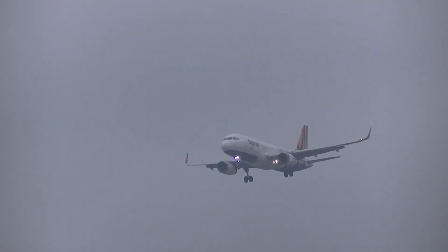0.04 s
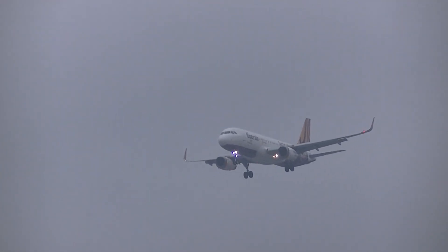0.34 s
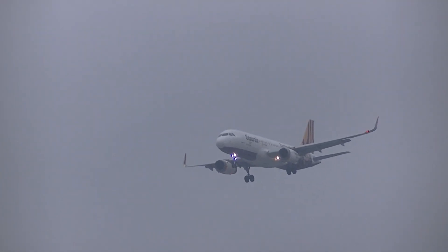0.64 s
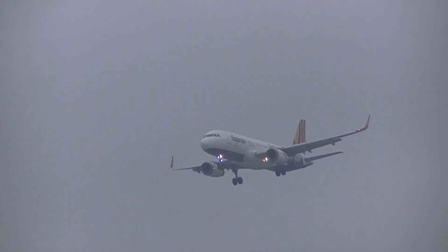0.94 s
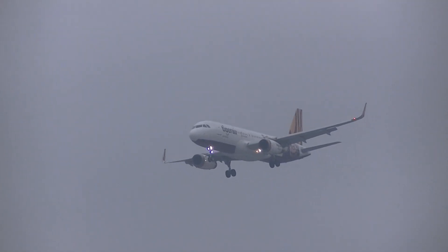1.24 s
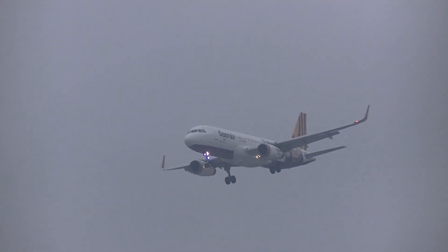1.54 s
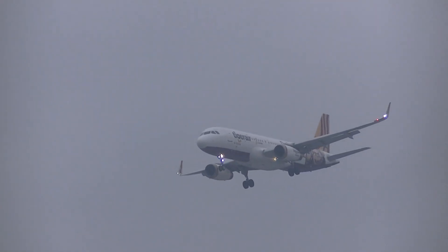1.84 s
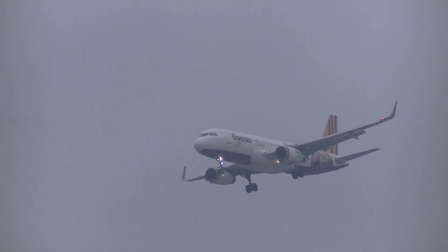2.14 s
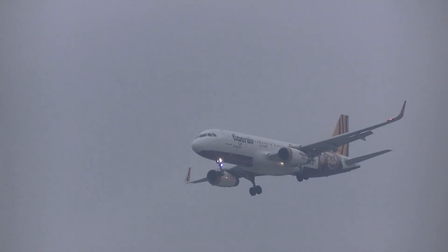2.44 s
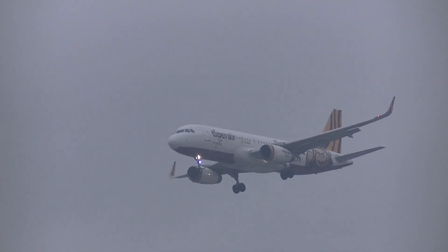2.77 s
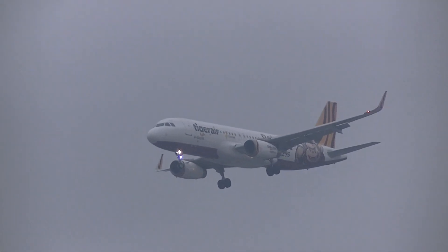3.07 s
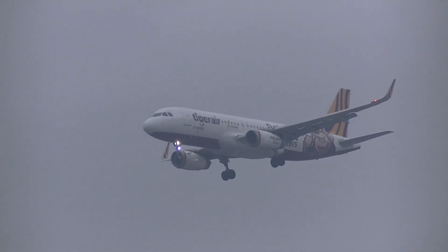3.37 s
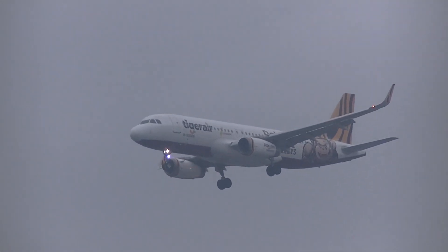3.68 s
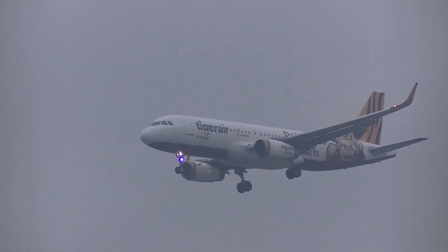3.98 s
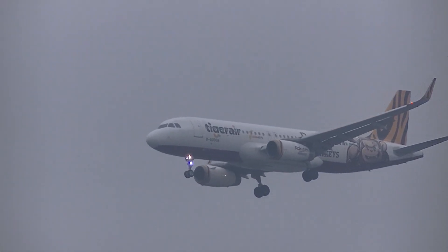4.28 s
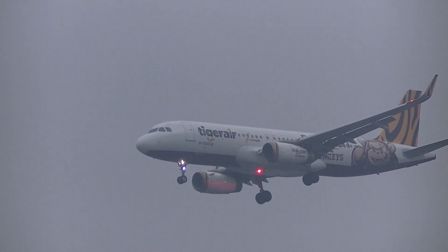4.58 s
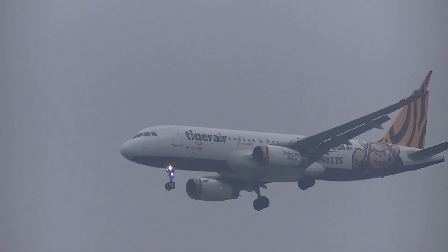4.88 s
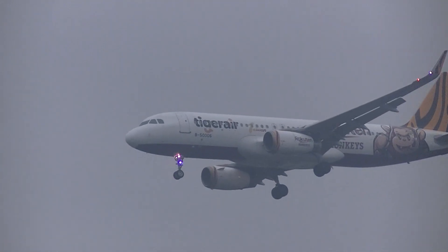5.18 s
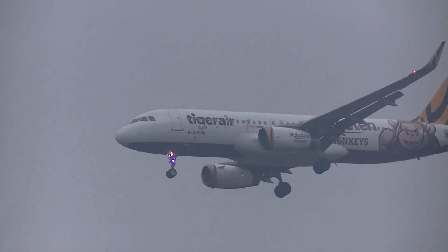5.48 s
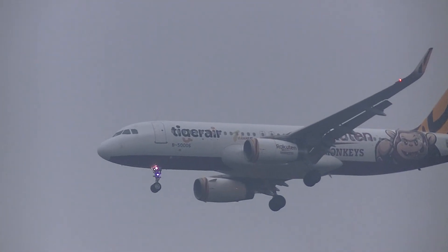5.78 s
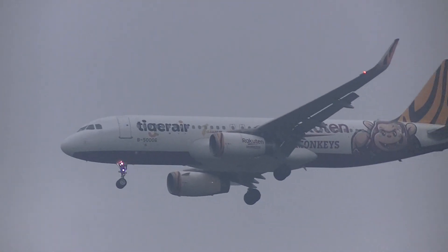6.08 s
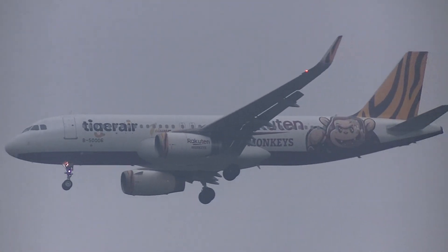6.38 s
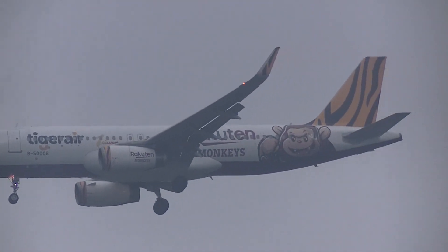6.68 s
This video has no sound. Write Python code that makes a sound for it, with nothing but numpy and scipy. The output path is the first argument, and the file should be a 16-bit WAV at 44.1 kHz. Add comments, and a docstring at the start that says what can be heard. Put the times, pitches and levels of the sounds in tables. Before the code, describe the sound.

From beneath a landing path, a stereo microphone in light air picks up an approaching airliner. Its turbofan hiss and airy roar build over the first few seconds, then stay loud and fluttering above an uneven rumble. A high whine flares and fades while gradually dropping in pitch, joined by a thin whistling rasp and faint sizzle. A small tick passes before halfway, and the roar takes on a hollow, phasing tone as the jet comes alongside.

```python
"""On the ground under a final approach path, a twin-engine airliner comes in low and draws level.
Fan hiss, airframe roar and jet rumble swell and waver in turbulent air, while the Doppler effect
slides the fan's whine down. Interference with a ground echo hollows the gusty low end.
A closely spaced stereo microphone listens in a light breeze. A narrow rasp with faint whistles,
a faint high sizzle and one small tick are also heard."""
import sys
import numpy as np
from scipy import signal
from scipy.io import wavfile

SR = 44100
rng = np.random.default_rng(int(sys.argv[2]) if len(sys.argv) > 2 else 0)


def dump(signal):
    """Clip the signal to [-1, 1] and save it as 16-bit WAV at the path in sys.argv[1]."""
    limited = np.clip(np.atleast_2d(signal).T, -1, 1)
    pcm = np.round(limited * 32767).astype(np.int16)
    wavfile.write(sys.argv[1], SR, pcm)


N = 300762
# Noise sources return a gain over frequency (HZ) and time (FRAME_S); tones return samples.
FRAME, HOP = 1024, 256
HZ = np.maximum(np.fft.rfftfreq(FRAME, 1 / SR), 1)[:, None]
FRAME_S = np.arange(-(-N // HOP) + 1) * HOP / SR
SAMPLE_S = np.arange(N) / SR


# intake noise: time_s, level_db
INTAKE_LEVEL = [(0.03, -36.5), (.6, -33), (1.0, -30.5), (1.17, -28), (1.58, -28), (1.85, -24.5),
                (2.09, -23), (2.22, -25), (2.65, -24.5), (2.85, -25), (3.15, -24), (3.35, -22.5),
                (3.9, -21.5), (4.24, -19), (4.36, -20.5), (4.5, -19.5), (4.8, -20), (5.35, -19.5),
                (5.59, -18.5), (5.78, -23.5), (6.06, -23), (6.21, -16.5), (6.33, -23.5), (6.52, -21.3),
                (6.65, -18), (6.8, -24.5)]
# its brief gusts and sags: centre_s, change_db
INTAKE_GUSTS = [(2.08, 1), (2.68, 1), (3.68, 2), (4.91, -2), (5.03, 1.5), (5.34, 1.7), (5.42, -0.5)]
# its spectrum: frequency_hz, density_db
INTAKE_SPECTRUM = [(200, -77), (900, -32), (1500, -15.5), (1950, -2), (2450, -0.3), (2800, -1.5),
                   (3200, 1.5), (3800, -2), (4280, 1.5), (4470, 3), (4700, 2), (5500, 0.5), (6300, -5),
                   (7300, -12), (9000, -21.5), (10000, -44.5)]
# its top band against its main band, which sets the air absorption: time_s, ratio_db
INTAKE_TREBLE = [(0, -18.5), (.6, -23), (2.0, -23), (4.2, -15.5), (6.82, -12.5)]

def fan_hiss():
    """Atmospheric absorption dulls the intake noise as frequency squared, less as the path shortens."""
    treble_db, = in_time(INTAKE_TREBLE)
    spectrum_db, = by_frequency(INTAKE_SPECTRUM)
    main_hz, top_hz = (2300, 5500), (6500, 9000)
    unabsorbed = from_db(spectrum_db)
    clear_db = 20 * np.log10(band_rms(unabsorbed, top_hz) / band_rms(unabsorbed, main_hz))
    air_db = (treble_db - clear_db) * np.minimum(HZ / 6800, 1.35) ** 2
    hiss = shaped_noise(spectrum_db + air_db, intake_level() - .6, main_hz)
    return hiss * turbulence(rate_hz=19.7, shared_db=0.44, patchy_db=1.61)


def intake_level():
    """Gains add in decibels: brief gusts and sags ride on the level of the intake noise."""
    return in_time(INTAKE_LEVEL)[0] + swells(INTAKE_GUSTS, half_s=0.051)


# Doppler glide of the blade-passing tone: time_s, pitch_hz
BLADE_PITCH = [(0, 2134), (.7, 2120), (1.05, 2100), (1.9, 2095), (3.0, 2072), (3.55, 2052), (4.0, 2028),
               (5.1, 1988), (5.3, 1970), (5.55, 1938), (5.95, 1905), (6.15, 1898), (6.55, 1860),
               (6.82, 1843)]
# the whine between flares: time_s, level_db
WHINE_LEVEL = [(0, -43), (.4, -44.5), (1.9, -32), (2.7, -38), (4.3, -34), (4.7, -30), (5.6, -31),
               (6.82, -29)]
# its momentary flares and fades: centre_s, half_length_s, change_db
WHINE_FLARES = [(.75, .025, -12), (.84, .04, 4), (1.08, .04, 7), (1.26, .04, -13), (1.36, .03, 6),
                (1.44, .02, -12), (2.0, .03, 5), (2.14, .03, 7), (2.23, .04, 9), (2.85, .03, -13),
                (2.94, .04, 7), (3.03, .03, 7.5), (3.68, .035, 5), (3.82, .025, -9), (4.4, .025, 4),
                (4.5, .035, 6), (4.66, .03, 7.5), (5.28, .055, 10.5), (5.5, .025, 5.5), (5.7, .02, -8),
                (5.77, .03, 3), (5.89, .035, -15), (5.97, .04, 7), (6.14, .04, 13), (6.33, .045, 8.5),
                (6.44, .022, -10), (6.53, .06, 8.5), (6.63, .025, 4), (6.72, .025, -4), (6.78, .025, 7.5)]
# its eddy-scattered part against its steady part: time_s, scatter_ratio
WHINE_SCATTER = [(0, .85), (3.5, .8), (4.5, .4), (5.3, .3), (6.82, .28)]

def fan_whine(jitter=0.001995, skirt_db=-10, low_ratio=.648):
    """The Doppler effect lowers the blade-passing tone and a faint lower engine tone on one glide."""
    pitch_hz, = in_time(BLADE_PITCH, SAMPLE_S)
    scatter, = in_time(WHINE_SCATTER, SAMPLE_S)
    flare_db = sum(db * bell(SAMPLE_S - s, half_s) for s, half_s, db in WHINE_FLARES)
    level_db = in_time(WHINE_LEVEL, SAMPLE_S)[0] + flare_db
    phase = 2 * np.pi * np.cumsum(pitch_hz * (1 + jitter * wander(10.4))) / SR
    # fast eddies spread a narrow skirt of noise around the tone
    skirt = from_db(skirt_db) * (wander(70) * np.cos(phase) + wander(70) * np.sin(phase))
    blades = from_db(level_db) * (scattered_tone(phase, scatter) + skirt)
    airframe_db, _ = in_time(FLOW_LEVELS, SAMPLE_S)
    low_tone = from_db(airframe_db - 13.5) * scattered_tone(low_ratio * phase, scatter=0.39)
    return blades + low_tone


# flow noise: time_s, airframe_db, jet_db
FLOW_LEVELS = [(0.03, -40.5, -53), (0.22, -42, -47), (0.43, -40, -56), (0.92, -39.5, -47.5),
               (1.24, -36.5, -48), (1.33, -33, -42.5), (1.6, -34, -40), (2.03, -28.5, -40.5),
               (2.09, -28.5, -31), (2.4, -28, -30), (2.68, -27, -30), (3.0, -30.5, -32.5), (3.35, -30, -31),
               (3.57, -24, -33), (3.69, -27, -28.5), (4.19, -28, -37), (4.46, -27.5, -35),
               (4.56, -23.5, -33.5), (4.8, -28.5, -33), (4.93, -27, -39), (4.99, -22, -33),
               (5.57, -26, -33), (5.88, -29.5, -35.5), (6.2, -23.5, -32), (6.42, -23, -28.5),
               (6.8, -26.5, -28)]
# flaps and gear: frequency_hz, density_db
AIRFRAME_SPECTRUM = [(80, -63), (400, -36), (700, -6), (950, -1.5), (1130, -1.5), (1300, 1.5), (1450, -1),
                     (1700, 0.5), (2300, -7), (4000, -33), (10000, -72)]
# exhaust jets: frequency_hz, density_db
JET_SPECTRUM = [(30, -75), (120, -57), (280, -7.5), (370, .5), (520, 4.5), (620, 5), (780, 2), (1100, 2),
                (2000, -56), (8000, -80)]

def roar():
    """Turbulent flow radiates broadband noise from flaps and gear, and deeper noise from the jets."""
    airframe_db, jet_db = in_time(FLOW_LEVELS)
    pitch_hz, = in_time(BLADE_PITCH)
    shifted_db, = by_frequency(AIRFRAME_SPECTRUM, doppler=pitch_hz / 2000)
    airframe = shaped_noise(shifted_db, airframe_db - 1.72, band_hz=(850, 1750))
    jets = shaped_noise(by_frequency(JET_SPECTRUM)[0], jet_db - 1.3, band_hz=(400, 750))
    return np.hypot(airframe, jets) * turbulence(rate_hz=14.4, shared_db=1.0, patchy_db=1.15)


# swells of the noise: centre_s, frequency_hz, half_length_s, half_width_octaves, rise_db
SURGES = [(2.16, 1250, 0.073, 0.38, 9), (2.46, 316, 0.17, 0.18, 9.5), (3.417, 1810, 0.041, .25, 6),
          (5.047, 795, 0.5, 0.14, 4.5), (5.316, 1910, 0.063, 0.49, 5), (5.53, 560, 0.11, 0.2, 8.5),
          (6.55, 964, 0.27, 0.061, 7.5)]

def surges():
    """Band-limited amplitude modulation: the noise swells briefly in one register or another."""
    return from_db(sum(db * bell(FRAME_S - s, half_s) * bell(np.log2(HZ / hz), half_octaves)
                       for s, hz, half_s, half_octaves, db in SURGES))


# a rough narrow rasp: frequency_hz, density_db
RASP_SPECTRUM = [(2000, -55), (2850, -24), (3080, -0.5), (3380, 0), (3600, 1), (5000, -42)]

def rasp():
    """Fast amplitude modulation roughens a narrow band of noise near 3 kHz into a rasp."""
    band = shaped_noise(by_frequency(RASP_SPECTRUM)[0], rasp_level(FRAME_S), band_hz=(2900, 3600))
    return band * turbulence(rate_hz=23, shared_db=2.0, patchy_db=3.5)


# brief swells of the rasp: centre_s, rise_db
RASP_SWELLS = [(1.2, 6.5), (1.78, 4), (2.36, 5.5), (2.66, 8), (3.3, 6.5), (3.47, 4), (3.58, 3), (3.7, 0),
               (3.85, 5), (4.09, 7), (4.24, 5.5), (4.82, 3), (5.0, 6)]

def rasp_level(times, offset_db=-13, fade_db_per_s=0.6):
    """Gains add in decibels: the rasp follows the intake noise, swells briefly and slowly fades."""
    steady_db = in_time(INTAKE_LEVEL, times)[0] + offset_db - fade_db_per_s * times
    return steady_db + swells(RASP_SWELLS, half_s=0.061, times=times)


# faint whistles, set against the rasp's level: pitch_hz, relative_db
WHISTLES = [(3090, -7), (3210, -4.5), (3330, -5), (3470, -8)]

def whistles(waver_hz=35, flicker_db=3.5):
    """Independent frequency and amplitude modulation make each whistle in the rasp waver and flicker."""
    tones = 0
    for hz, db in WHISTLES:
        phase = 2 * np.pi * np.cumsum(hz + waver_hz * wander(7)) / SR
        tones += from_db(db + flicker_db * wander(17)) * scattered_tone(phase, scatter=1)
    return from_db(rasp_level(SAMPLE_S)) * tones


# steady low rumble: time_s, level_db
BUFFET_LEVEL = [(0, -43.5), (.5, -49), (1.0, -45.5), (1.7, -42), (2.0, -42.5), (2.4, -51), (3.3, -41),
                (4.1, -43), (5.1, -49.5), (5.9, -50.5), (6.82, -44)]
# its spectrum: frequency_hz, density_db
BUFFET_SPECTRUM = [(30, -70), (70, -52), (110, -19), (160, -3), (230, 5.5), (340, 4.5), (490, -5),
                   (700, -6), (4000, -81)]
# soft bumps within it: centre_s, half_length_s, level_db
BUMPS = [(.135, 0.0082, -36), (0.236, 0.02, -37), (0.708, 0.011, -33), (0.845, 0.084, -40),
         (1.035, 0.05, -39), (1.315, 0.055, -35), (1.637, 0.021, -36), (2.78, .025, -38),
         (3.26, .03, -35.5)]
# their spectrum: frequency_hz, density_db
BUMP_SPECTRUM = [(30, -70), (110, -22), (160, -5), (230, 5), (350, 2.5), (490, -0.5), (700, -12),
                 (4000, -81)]

def buffeting(band_hz=(120, 350)):
    """Incoherent addition: a low rumble and soft, slightly brighter bumps sum in power."""
    steady = shaped_noise(by_frequency(BUFFET_SPECTRUM)[0], in_time(BUFFET_LEVEL)[0], band_hz)
    envelope = sum(from_db(db) * bell(FRAME_S - s, half_s) for s, half_s, db in BUMPS)
    bumps = envelope * shaped_noise(by_frequency(BUMP_SPECTRUM)[0], 0, band_hz)
    return np.hypot(steady, bumps) * turbulence(rate_hz=41, shared_db=0.4, patchy_db=1.5)


# one small sharp contact: start_s, level_db, left_minus_right_db
TICKS = [(2.8553, -5, -9)]
# its modes: pitch_hz, relative_db, t60_s
TICK_MODES = [(5360, 4, 0.0023), (8100, -12, 0.0048), (10800, -11, 0.0037), (12800, -30, .006)]

def tick():
    """A tiny hard impact excites damped modes that ring for a few milliseconds, with no bass."""
    stereo = np.zeros((2, N))
    age_s = np.arange(SR // 20) / SR
    ring = sum(from_db(db) * np.exp(-np.log(1000) * age_s / t60_s) * np.sin(2 * np.pi * hz * age_s)
               for hz, db, t60_s in TICK_MODES)
    for start_s, db, pan_db in TICKS:
        start = round(start_s * SR)
        stereo[:, start:start + len(ring)] += from_db([[db + pan_db / 2], [db - pan_db / 2]]) * ring
    return signal.sosfilt(signal.butter(1, 900, "high", fs=SR, output="sos"), stereo + 1e-18)


# faint high sizzle: frequency_hz, density_db
SIZZLE_SPECTRUM = [(4000, -20), (9000, -2), (10000, -1), (11000, 1), (13000, 0), (16000, -1)]

def high_sizzle():
    """Amplitude modulation: a faint, even sizzle above 10 kHz follows the loudness of the hiss."""
    return shaped_noise(by_frequency(SIZZLE_SPECTRUM)[0], intake_level() - 41.5, band_hz=(10000, 16000))


# light air on the microphone: time_s, level_db
BREEZE_LEVEL = [(0, -80), (2.2, -81), (3.2, -79), (5.2, -73), (5.9, -74), (6.82, -71)]
# its puffs: centre_s, rise_db
BREEZE_PUFFS = [(.55, 2), (1.03, 15), (1.5, 4), (4.65, 9)]
# its spectrum: frequency_hz, density_db
BREEZE_SPECTRUM = [(20, -19), (50, -25), (80, -4), (115, 3), (150, 7), (250, -15), (2000, -70)]

def breeze():
    """Pressure fluctuations of light air on the microphone add a faint, uneven bass."""
    level_db = in_time(BREEZE_LEVEL)[0] + swells(BREEZE_PUFFS, half_s=0.049)
    bass = shaped_noise(by_frequency(BREEZE_SPECTRUM)[0], level_db, band_hz=(40, 110))
    return bass * turbulence(rate_hz=7.3, shared_db=3.5, patchy_db=1.5)


# ground reflection: time_s, lag_ms, strength_ratio
GROUND_ECHO = [(0, 2.25, .3), (2.2, 2.2, .25), (3.0, 2.3, .12), (4.2, 3.0, .15), (4.55, 3.45, .6),
               (4.8, 3.95, .75), (5.15, 4.4, .72), (5.6, 4.55, .65), (6.82, 4.6, .52)]

def with_ground_echo(direct, scatter_hz=537):
    """Comb filtering: the echo lags more as the aircraft's elevation grows, so the notches sink."""
    lag_ms, strength = in_time(GROUND_ECHO, SAMPLE_S)
    # rough ground scatters the treble away
    dull = signal.sosfiltfilt(signal.butter(2, scatter_hz, fs=SR, output="sos"), direct)
    echo = np.array([np.interp(SAMPLE_S - lag_ms / 1000, SAMPLE_S, side) for side in dull])
    return direct + strength * echo


# the stereo pair: frequency_hz, left_minus_right_db, left_lead_rad, coherence_ratio
MICROPHONE_PORTS = [(40, -5, 2.6, .4), (90, -9.6, 2.86, .85), (250, -9.7, 2.66, .96),
                    (500, -6.8, 2.08, .988), (1000, -1.6, 1.3, .982), (1600, 1.6, .95, .935),
                    (2050, 7.8, .3, .91), (2350, 2, -.63, .84), (2750, -3.1, -.75, .54),
                    (3050, -1, .05, .88), (4400, -1.6, -.26, .96), (6300, -6.4, -.45, .85),
                    (8100, -6.5, -.5, .75), (9200, -18, -1, .07), (10200, -.8, -.66, .03)]

def microphone(noise_gain, tones):
    """Partial coherence: two close ports share part of the noise, nearly in antiphase in the bass."""
    balance_db, lead_rad, coherence = by_frequency(MICROPHONE_PORTS)
    left_gain = from_db(balance_db)
    shared, *separate = to_frames(rng.standard_normal((3, N)))
    coherent = np.sqrt(coherence) * noise_gain * shared + to_frames(tones)
    incoherent = np.sqrt(1 - coherence) * noise_gain * np.array(separate)
    response = np.array([left_gain * np.exp(.5j * lead_rad), np.exp(-.5j * lead_rad)])
    mono_gain = np.sqrt(1 + left_gain ** 2 + 2 * left_gain * coherence * np.cos(lead_rad)) / 2
    ports = (coherent + incoherent) * response / mono_gain
    return signal.istft(ports, nperseg=FRAME, noverlap=FRAME - HOP)[1][:, :N]


def turbulence(rate_hz, shared_db, patchy_db):
    """Scintillation: eddies on the path flutter the level, as a whole and in third-octave patches."""
    patches = drift(rate_hz, count=32)
    third_octave = 3 * np.log2(np.maximum(HZ, 20) / 20)
    blend = np.maximum(1 - np.abs(third_octave - np.arange(len(patches))), 0)
    return from_db(shared_db * drift(rate_hz) + patchy_db * blend @ patches)


def scattered_tone(phase, scatter):
    """Superposition of a steady wave and a part scattered by eddies gives a tone of rms 1."""
    phasor = (1 + scatter * (wander(27) + 1j * wander(27))) / np.sqrt(1 + 2 * scatter ** 2)
    return np.sqrt(2) * np.real(phasor * np.exp(1j * phase))


def drift(rate_hz, count=1):
    """Low-pass filtered noise: rows of slow chance on the frame grid, standard deviation 1."""
    pole = np.exp(-2 * np.pi * rate_hz * HOP / SR)
    white = rng.standard_normal((count, 2 * len(FRAME_S)))
    slow = signal.lfilter([1], [1, -2 * pole, pole * pole], white)[:, -len(FRAME_S):]
    return slow / slow.std()


def wander(rate_hz):
    """One random drift, interpolated to the sample grid."""
    return np.interp(SAMPLE_S, FRAME_S, drift(rate_hz)[0])


def shaped_noise(spectrum_db, level_db, band_hz):
    """Spectral shaping: the gain that gives white noise this spectrum and this level in a band."""
    gain = from_db(spectrum_db)
    return gain / band_rms(gain, band_hz) * from_db(level_db)


def band_rms(gain, band_hz):
    """Parseval's theorem gives the rms, inside a band, of white noise through this gain."""
    inside = (HZ >= band_hz[0]) & (HZ <= band_hz[1])
    return np.sqrt(np.mean(gain ** 2 * inside, axis=0))


def swells(rows, half_s, times=FRAME_S):
    """Level change in dB from a sum of brief Gaussian rises and dips."""
    return sum(db * bell(times - s, half_s) for s, db in rows)


def bell(offset, half_width):
    """A Gaussian curve that falls to 1/e at half_width."""
    return np.exp(-(offset / half_width) ** 2)


def in_time(rows, times=FRAME_S):
    """Linear interpolation of a table's columns in time."""
    time_s, *columns = np.transpose(rows)
    return [np.interp(times, time_s, column) for column in columns]


def by_frequency(rows, doppler=1):
    """Interpolation of a table's columns in log frequency, shifted by a Doppler factor."""
    hz, *columns = np.transpose(rows)
    return [np.interp(np.log(HZ / doppler), np.log(hz), column) for column in columns]


def to_frames(sound):
    """The short-time Fourier transform splits a sound into overlapping spectra."""
    return signal.stft(sound, nperseg=FRAME, noverlap=FRAME - HOP)[2]


def from_db(db):
    """Decibels to amplitude ratio."""
    return 10 ** (np.asarray(db) / 20)


def scene():
    """Uncorrelated noises add in power and arrive with the tones, directly and off the ground."""
    noises = fan_hiss(), rasp(), roar(), buffeting(), high_sizzle(), breeze()
    noise_gain = np.sqrt(sum(gain ** 2 for gain in noises)) * surges()
    tones = fan_whine() + whistles()
    return with_ground_echo(microphone(noise_gain, tones)) + tick()


def record(dry, cutoff_hz=15900):
    """Clipping and band limiting: peaks stop at full scale, then the top is cut steeply."""
    low_pass = signal.ellip(12, .1, 80, cutoff_hz, fs=SR, output="sos")
    return signal.sosfilt(low_pass, np.clip(dry, -1, 1))


dry = scene()
out = record(dry)
dump(out)
```